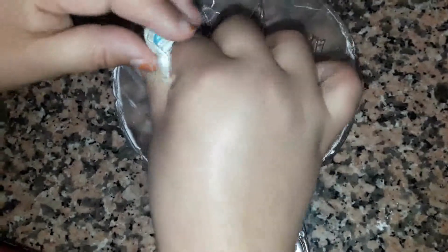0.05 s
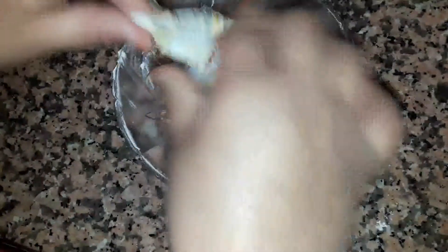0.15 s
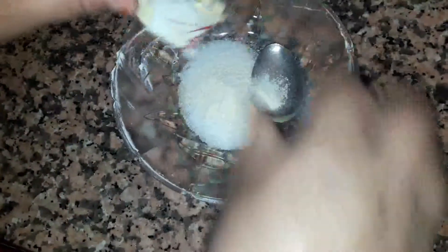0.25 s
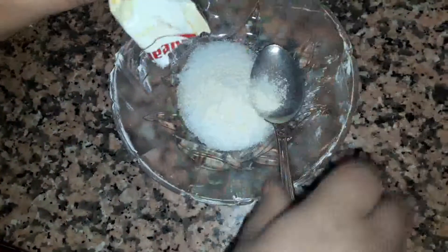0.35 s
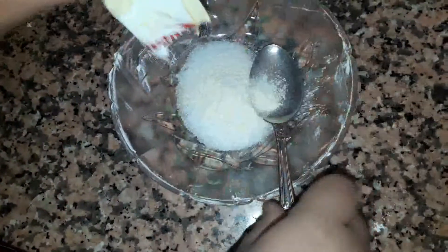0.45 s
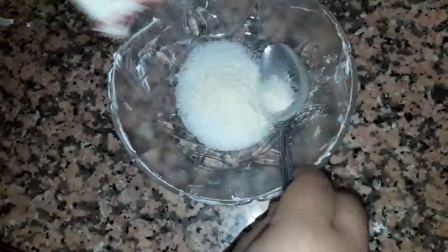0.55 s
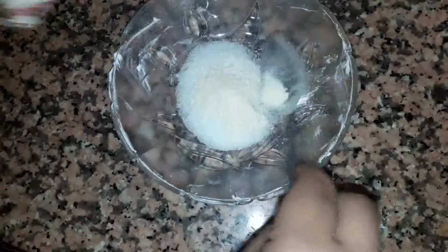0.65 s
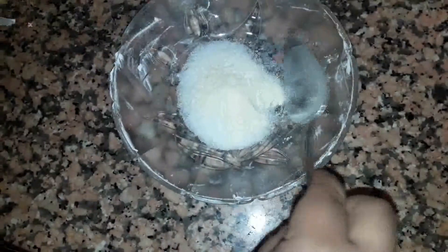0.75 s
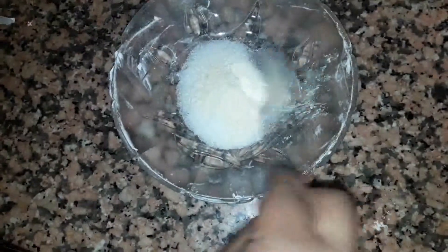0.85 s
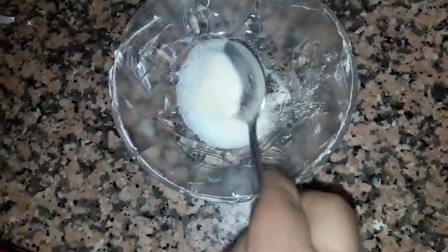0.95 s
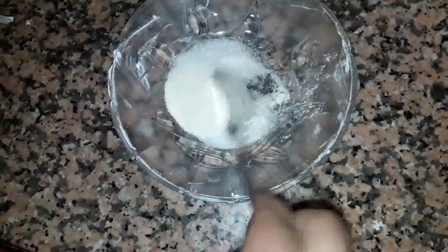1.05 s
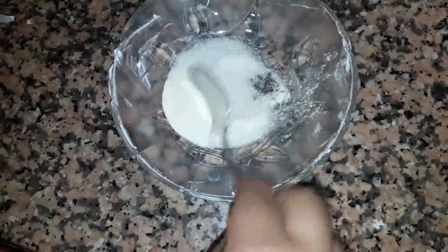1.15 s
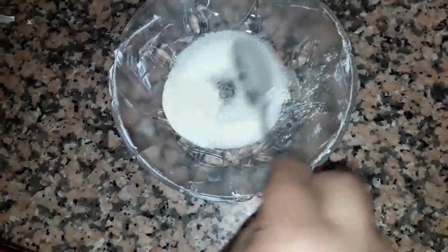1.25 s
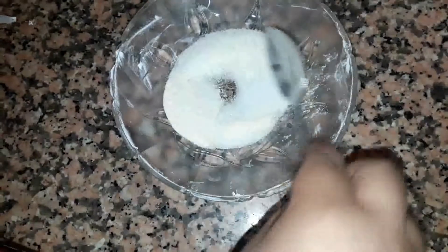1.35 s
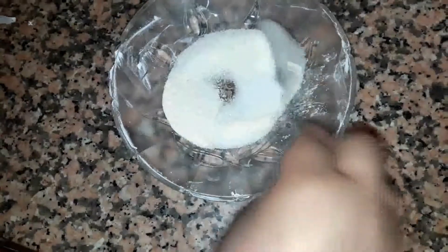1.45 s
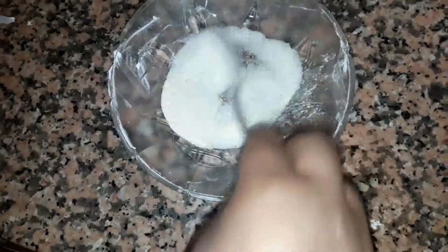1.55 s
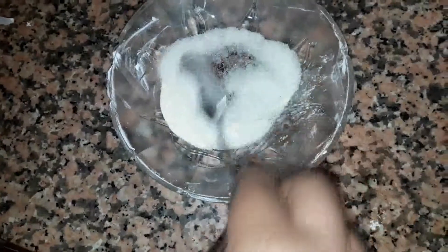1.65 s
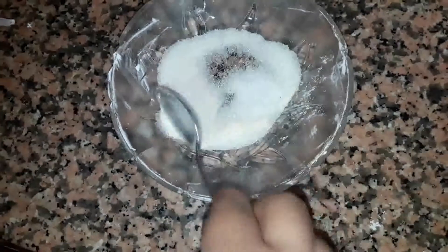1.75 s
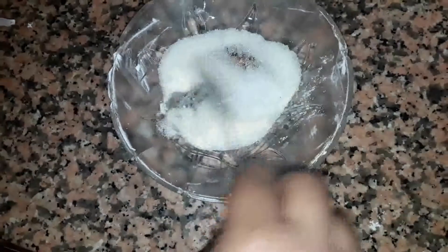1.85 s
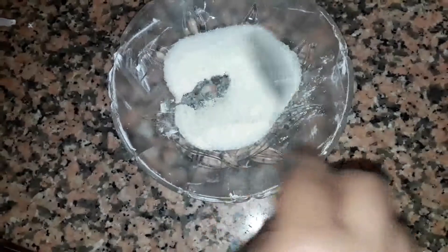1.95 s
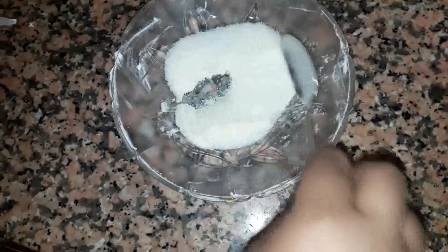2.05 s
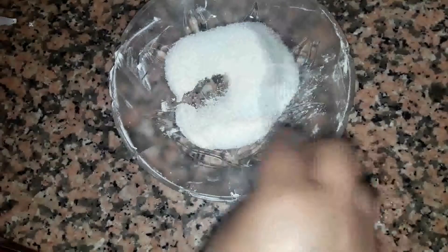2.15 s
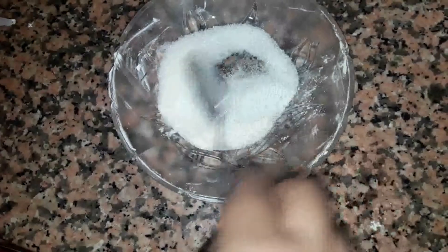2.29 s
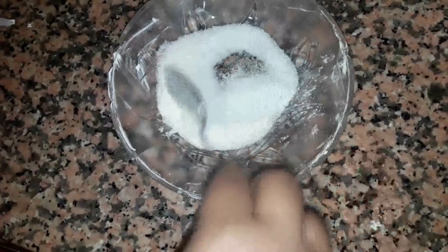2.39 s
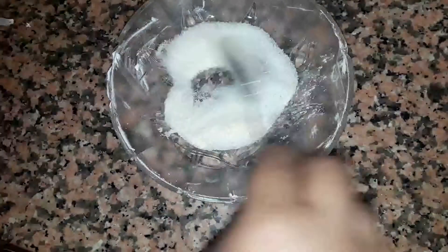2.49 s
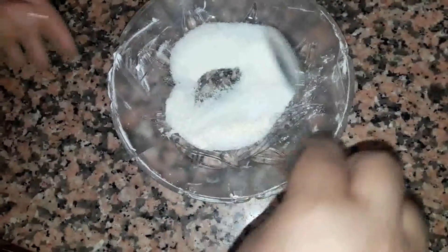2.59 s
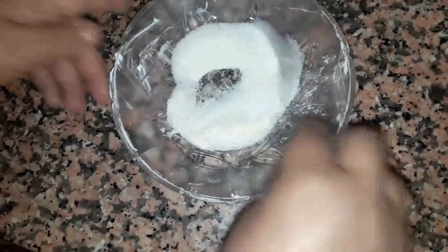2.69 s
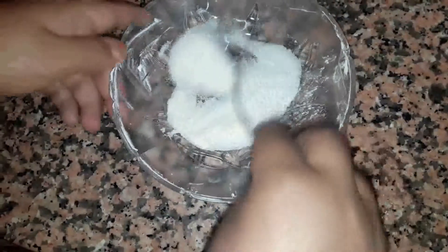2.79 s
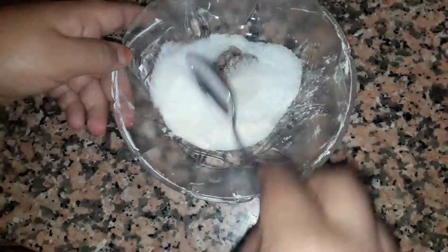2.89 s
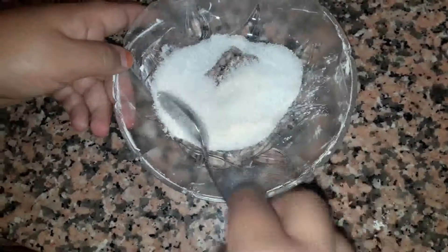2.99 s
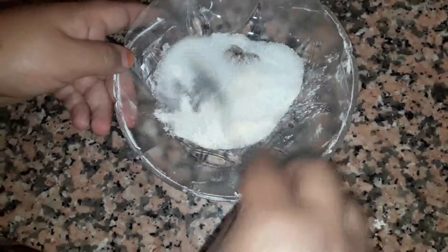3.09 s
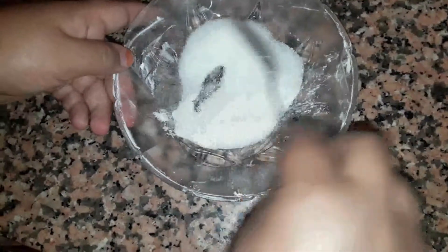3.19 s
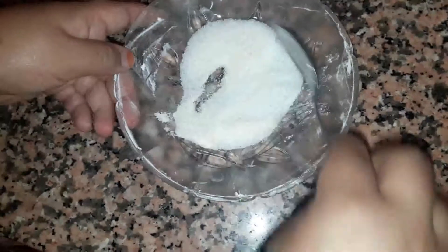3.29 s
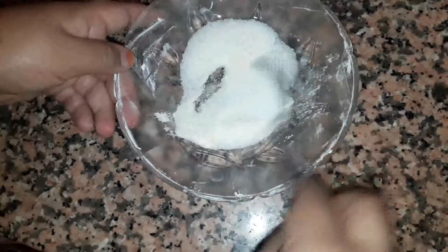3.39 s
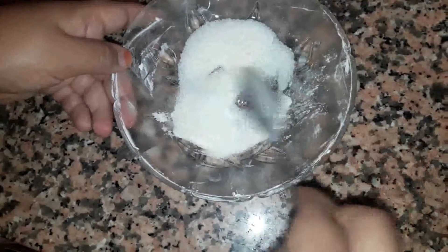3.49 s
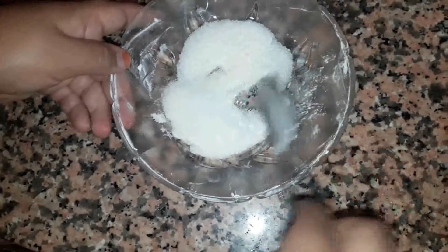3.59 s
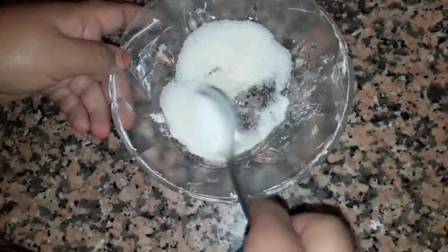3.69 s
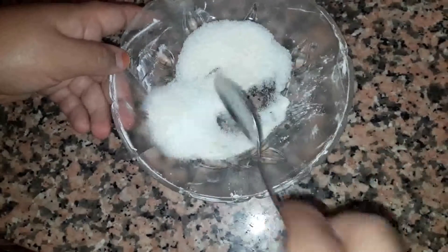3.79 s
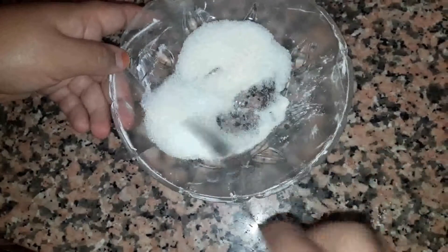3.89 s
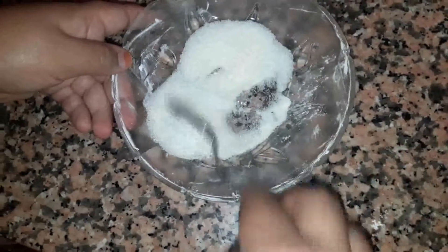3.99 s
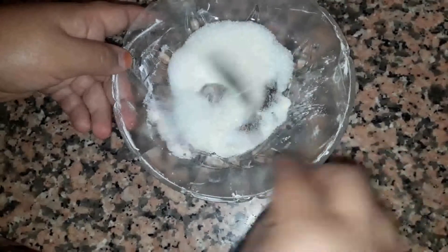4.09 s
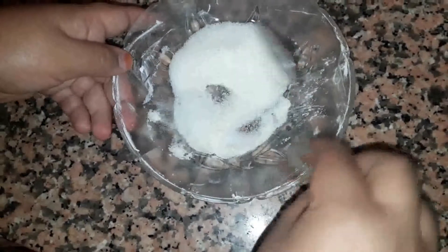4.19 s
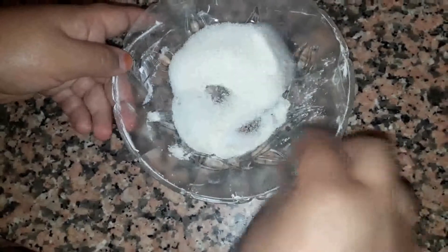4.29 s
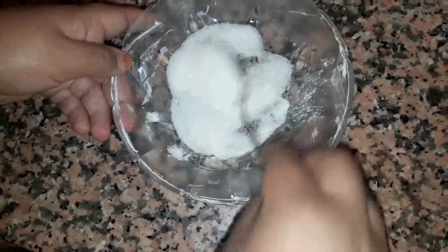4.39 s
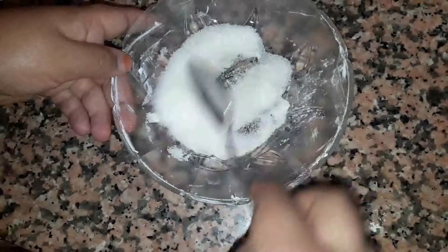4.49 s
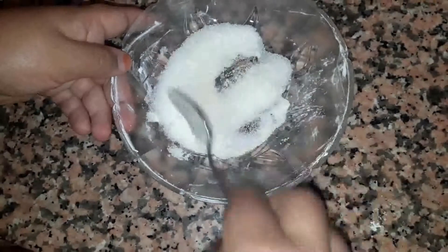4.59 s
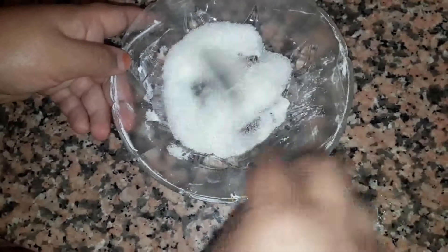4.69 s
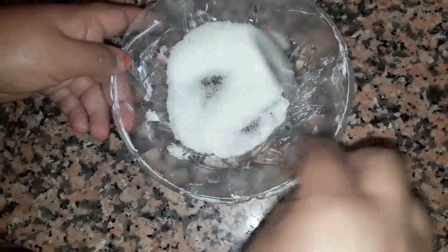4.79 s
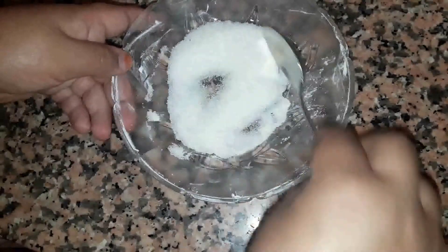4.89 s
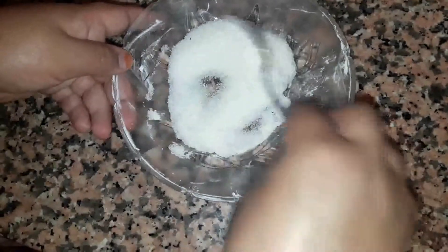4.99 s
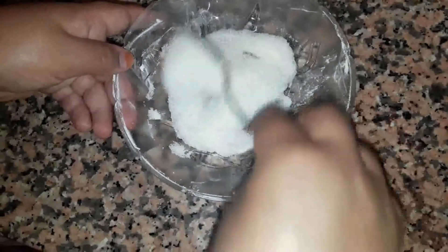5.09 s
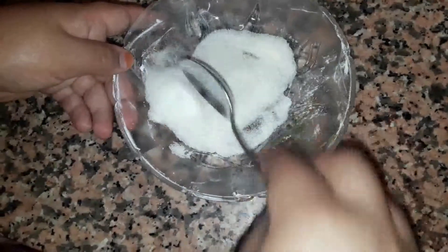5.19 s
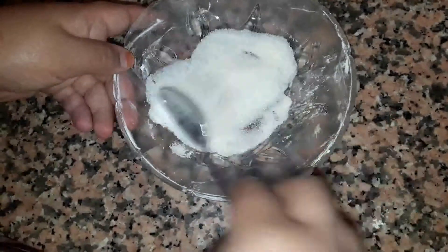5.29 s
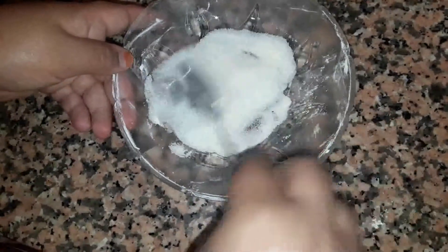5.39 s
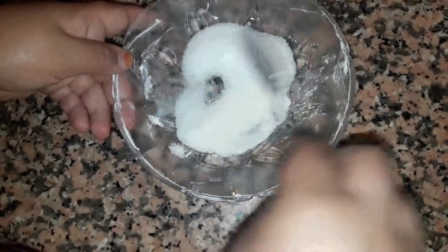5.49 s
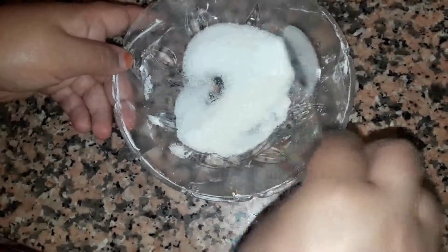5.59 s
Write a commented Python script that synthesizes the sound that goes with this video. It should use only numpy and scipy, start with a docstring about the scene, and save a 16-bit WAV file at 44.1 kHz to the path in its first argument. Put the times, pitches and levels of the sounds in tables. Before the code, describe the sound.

Close up in a small hard-walled kitchen, a thin packet snaps and crackles as powder hisses out. A metal spoon taps a glass bowl, then hits it hard with one bright short ring and a thud. Rapid stirring follows, about three turns a second, with gritty scrapes and powder-damped clinks. Low handling rumble and bumps come from a hand-held microphone with limited treble, over a faint steady hush.

```python
"""A steel spoon strikes a glass bowl once so that it rings, then stirs powder in it about three turns a second.
Each contact makes a knock, a crack and short dying tones; filtered random grains make the scrape between.
Before that a packet is crinkled and shaken out: snapping creases, a crackle of film and a hiss of powder.
Packed powder creaks in short chirps; low filtered noise is the rumble of bowl and hand-held microphone.
The bowl stands on a stone counter in a small kitchen, heard as faint dense echoes and a steady hush."""
import sys
import numpy as np
from scipy import signal
from scipy.fft import rfft, irfft, next_fast_len
from scipy.io import wavfile
from scipy.ndimage import uniform_filter1d

SR = 44100
rng = np.random.default_rng(int(sys.argv[2]) if len(sys.argv) > 2 else 0)


def transcribe(u):
    """Save the signal u as a 16-bit wav file named by the first command-line argument.

    u: samples, shape (n,) or (channels, n), limited to [-1, 1]; the rate is SR.
    q: integer samples, one column per channel.
    """
    v = np.clip(np.atleast_2d(u).T, -1, 1)
    q = np.round(v * 32767).astype(np.int16)
    wavfile.write(sys.argv[1], SR, q)


N = 249165  # length of the scene in samples
TIME = np.arange(N) / SR


def gain_of(db):
    """Turns decibels into an amplitude factor."""
    return 10 ** (np.asarray(db) / 20)


def evened(x):
    """Scales a sound to an average (rms) level of 1."""
    return x / np.sqrt(np.mean(x ** 2) + 1e-20)


def noise(count):
    """Plain random noise."""
    return rng.standard_normal(count)


def read(points, hz):
    """Reads a table between its points, along a logarithmic frequency axis."""
    f, value = np.transpose(points)
    return np.interp(np.log(hz + 1), np.log(f + 1), value)


def coloured(x, spectrum):
    """Filters a sound by a table of (frequency [Hz], level [dB])."""
    size = next_fast_len(len(x) + 2048)
    gain = gain_of(read(spectrum, np.fft.rfftfreq(size, 1 / SR)))
    return irfft(rfft(x, size) * gain, size)[:len(x)]


def fade(t, t60):
    """Exponential decay that has dropped by 60 dB after t60 seconds."""
    return np.exp(-np.log(1000) * t / t60)


def swell(s, attack_s, hold_s, t60):
    """The level of one gesture starting at time s: a straight rise, a hold, an exponential release."""
    t = TIME - s
    return np.clip(t / attack_s, 0, 1) * fade(np.maximum(t - attack_s - hold_s, 0), t60)


def add(mix, s, sound):
    """Mixes a sound in at time s."""
    part = mix[max(round(s * SR), 0):][:len(sound)]
    part += sound[:len(part)]


def ring(modes, t, spread_db=0, detune=0):
    """Dying tones of a struck body; the place of the blow may change the strength and pitch of each."""
    hz, db, t60 = np.transpose(modes)[:, :, None]
    strength, shift, side = rng.standard_normal((3, len(modes), 1))
    swing = np.sign(side) * np.sin(2 * np.pi * hz * (1 + detune * shift) * t)
    return (gain_of(db + spread_db * strength) * fade(t, t60) * swing).sum(0)


def grains(per_s, spread_db):
    """Sparse random clicks, most of them small and a few large."""
    size = gain_of(spread_db * np.minimum(rng.exponential(1, N), 4))
    present = rng.random(N) < per_s / SR
    return evened(size * noise(N) * present)


# colour of the room's steady hush: (frequency [Hz], relative level [dB per Hz])
HUSH_COLOUR = [(20, -21.5), (45, -5.5), (90, -0.5), (140, -1.5), (220, -4.5), (370, -9), (470, -2),
               (600, -11), (1000, -12), (1900, -11.5), (3200, -21), (4400, -26.5), (7200, -25),
               (7800, -33.5)]


def hush():
    """The steady quiet of the room: filtered noise at one level throughout."""
    return gain_of(-63) * evened(coloured(noise(N), HUSH_COLOUR))


# colour of the rumble: (frequency [Hz], relative level [dB per Hz])
RUMBLE_COLOUR = [(18, -49.5), (30, -20.5), (59, -20.5), (81, -6.5), (125, 0), (205, -8.5), (256, -11.5),
                 (293, -5.5), (397, -20.5), (481, -14.5), (616, -24.5), (800, -28), (1040, -50.5),
                 (1760, -120)]
# the hand shifting its grip on the microphone's case: (time [s], hold [s], level before rumble_db [dB])
GRIPS = [(-.03, 0.094, -49.5), (0.426, 0.31, -57.5), (0.751, 0.23, -55.5), (1.356, 0.42, -44),
         (5.53, .1, -51)]
GRIP_ATTACK_S, GRIP_T60 = .03, 0.4
# turns of the spoon through the powder, also played by scrape(), levels before each sound's own trim:
# (time [s], hold of the scrape [s], rub on the glass [dB], hiss of the grains [dB], rumble of the bowl [dB])
TURNS = [(0.694, 0.04, -69.5, -68, -64), (1.084, 0.045, -64.5, -61.5, -66), (1.22, 0.057, -67, -55, -55),
         (1.493, 0.023, -70.5, -47, -56.5), (1.732, .1, -54.5, -57, -62), (1.877, 0.056, -56, -58, -52.5),
         (2.15, 0.084, -57, -54, -50.5), (2.478, 0.036, -76, -60.5, -58), (2.77, 0.13, -70.5, -61, -54),
         (3.131, 0.065, -76, -71, -53), (3.451, 0.045, -66, -51, -64.5), (3.69, .08, -61, -56, -53.5),
         (4.047, 0.037, -76, -79.5, -68), (4.405, 0.037, -71.5, -54, -52.5), (4.721, .07, -65, -72, -56),
         (4.992, 0.16, -55.5, -56, -56.5), (5.462, .12, -69, -64, -52.5)]
PUSH_ATTACK_S, PUSH_HOLD_S, PUSH_T60 = 0.0067, .08, .5  # rises sooner than the scrape


def rumble(rumble_db=-2, holding_db=-65):
    """Low noise that swells with each push on the bowl and each change of grip."""
    pushes = [gain_of(db) * swell(s, PUSH_ATTACK_S, PUSH_HOLD_S, PUSH_T60) for s, *_, db in TURNS]
    grips = [gain_of(db) * swell(s, GRIP_ATTACK_S, hold_s, GRIP_T60) for s, hold_s, db in GRIPS]
    # separate rumbles add up in power
    level = np.sqrt(gain_of(holding_db) ** 2 + sum(part ** 2 for part in pushes + grips))
    return gain_of(rumble_db) * level * evened(coloured(noise(N), RUMBLE_COLOUR))


# soft bumps of the microphone's case: (time [s], peak level [dB], frequency [Hz])
BUMPS = [(1.382, -42.5, 135.7), (1.646, -40.5, 118), (1.755, -36, 141.7), (2.675, -52, 81.6),
         (4.41, -44.5, 122.2), (4.444, -37.5, 111), (5.555, -43, 152.1), (5.626, -43.5, 156.7)]


def bumps(rise_s=0.011):
    """Each bump is a short low tone that rises quickly and dies away."""
    out, t = np.zeros(N), TIME[:SR // 5]
    for s, db, hz in BUMPS:
        shape = t / rise_s * np.exp(1 - t / rise_s)
        add(out, s, gain_of(db) * shape * np.sin(2 * np.pi * hz * t))
    return out


# how long the kitchen's echoes last: (frequency [Hz], time to drop 60 dB [s])
KITCHEN_DECAY = [(150, 0.1), (700, .42), (1800, 0.36), (4000, 0.46), (7500, 0.39)]


def kitchen(x, first_s=.006):
    """Dense reflections of random sign off hard walls, each band dying at its own speed."""
    present = rng.random(SR) < 3000 / SR  # 3000 reflections a second
    taps = rng.choice([-1., 1.], SR) * present * (TIME[:SR] > first_s)
    hz, t, bands = signal.stft(taps, SR, nperseg=256)
    decay = fade(t, read(KITCHEN_DECAY, hz)[:, None])
    tail = signal.istft(bands * decay, SR, nperseg=256)[1]
    return signal.fftconvolve(x, tail / np.linalg.norm(tail))[:N]


# sharp creases of the packet: (time [s], level before snap_db [dB], frequency [Hz])
SNAPS = [(0.0364, -25, 2046), (0.0757, -26, 2180), (0.1146, -25, 2270), (0.1506, -34, 2050),
         (0.1913, -31.5, 2510), (0.238, -27.5, 2380), (0.2544, -27.5, 2300), (0.2934, -29.5, 2440),
         (0.3213, -26.5, 2570), (0.3532, -35, 2800), (0.401, -29, 2900), (0.431, -16, 2862),
         (0.5381, -41.5, 2870), (0.5812, -40.5, 2860)]
# colour of the packet's film: (frequency [Hz], relative level [dB per Hz])
FILM_COLOUR = [(150, -27), (400, -9.5), (900, -6), (1500, -6), (2200, 7), (2900, -0.5), (3800, -10),
               (4800, -2.5), (6000, -11), (7800, -7)]


def snaps(snap_db=-1, snap_t60=0.027, pop_db=-19, sag=.2, sag_s=0.0037):
    """Creases snap as bursts of noise; the harder the snap, the more the film pops with a pitch."""
    out, t = np.zeros(N), TIME[:SR // 10]
    for s, db, hz in SNAPS:
        crack = evened(coloured(noise(len(t)), FILM_COLOUR))
        # the pitch drops as the film slackens
        pitch = hz * (1 + sag * (np.exp(-t / sag_s) - .7))
        pop = np.sqrt(gain_of(db - pop_db)) * np.sin(2 * np.pi * np.cumsum(pitch) / SR)
        add(out, s, gain_of(db + snap_db) * fade(t, snap_t60) * (crack + pop))
    return out


def crinkle():
    """Folds of nine sizes, from large and dull to small and bright, each crackle in bunches of their own."""
    crackle = 0
    for hz in np.geomspace(500, 6500, num=9):
        clumps = gain_of(4.1 * evened(uniform_filter1d(noise(N), size=900)))
        fold_band = [(hz / 1.8, -40), (hz / 1.15, 0), (hz * 1.15, 0), (hz * 1.8, -40)]
        crackle = crackle + coloured(clumps * grains(per_s=1800, spread_db=2.8), fold_band)
    return evened(coloured(crackle, FILM_COLOUR))


# colour of the pouring powder: (frequency [Hz], relative level [dB per Hz])
POUR_COLOUR = [(2500, -14), (4500, -12.5), (5600, -3), (6800, 3), (7800, 2.5)]
# shakes of the packet: (time [s], hold [s], crinkle level [dB], pouring hiss level before pour_db [dB])
SHAKES = [(-.01, 0.065, -45.5, -37), (0.154, 0.081, -41.5, -44), (.3, .14, -52.5, -65.5),
          (0.496, 0.12, -56.5, -64.5), (0.63, 0.03, -51, -54)]
SHAKE_ATTACK_S, SHAKE_T60 = 0.016, 0.15


def packet(pour_db=-1):
    """Creases snap over a fine crackle of film and a hiss of powder, which swell with each shake."""
    out = snaps()
    film = crinkle()
    pour = gain_of(pour_db) * evened(coloured(grains(per_s=4000, spread_db=0.5), POUR_COLOUR))
    for s, hold_s, film_db, powder_db in SHAKES:
        shake = swell(s, SHAKE_ATTACK_S, hold_s, SHAKE_T60)
        out += shake * (gain_of(film_db) * film + gain_of(powder_db) * pour)
    return out


# packed powder creaking under the spoon: (time [s], hold [s], level [dB], middle frequency [Hz])
CREAKS = [(1.335, 0.012, -45.5, 1094), (1.751, .025, -56.5, 1165), (1.93, 0.09, -58, 1180),
          (2.069, 0.0098, -45, 1240), (3.527, .14, -61.5, 462)]
CREAK_ATTACK_S, CREAK_T60 = 0.0091, 0.082


def creak(slips_per_s=160, slip_t60=0.0081):
    """Packed powder sticks and slips unevenly; each slip is a short dull chirp."""
    out, t = np.zeros(N), TIME[:SR // 50]
    for start, hold_s, level_db, hz in CREAKS:
        slips = np.zeros(N)
        gap, size, pitch = rng.standard_normal((60, 3)).T
        times = start + np.cumsum(np.exp(0.45 * gap)) / slips_per_s
        for s, db, shift in zip(times, 3 * size, 1 + .12 * pitch):
            chirp = t * fade(t, slip_t60) * np.sin(2 * np.pi * hz * shift * t)
            add(slips, s - 1 / slips_per_s, gain_of(db) * chirp)
        slips /= np.std(slips[slips != 0])
        out += gain_of(level_db) * swell(start, CREAK_ATTACK_S, hold_s, CREAK_T60) * slips
    return out


# colour of the rub on the glass: (frequency [Hz], relative level [dB per Hz])
RUB_COLOUR = [(300, -25), (700, 8), (1000, -10.5), (1300, -1), (2200, -6.5), (2800, -10.5), (4000, -31)]
# colour of the hiss of crushed grains: (frequency [Hz], relative level [dB per Hz])
HISS_COLOUR = [(1800, -28), (2800, -2), (3500, 3), (4400, -4.5), (5100, 6.5), (5700, -4), (6500, 3.5),
               (7400, -1), (8000, -4.5)]
# tones of spoon and bowl pressed together, damped by the powder, also played by clink():
# (frequency [Hz], level [dB], time to drop 60 dB [s])
PRESSED = [(760, -8, .025), (960, -4, .065), (1330, -8, .03), (1470, -2, .05), (1640, -4, .035),
           (1880, 2, .045), (2050, -1, .025), (2245, 2, .045), (2420, -2, .035), (2730, 0, .03),
           (2950, -1, .025), (3370, -2, .028), (3630, -4, .03), (4010, -9, .03), (5030, -6, .05),
           (5390, -12, .03), (6380, -1, .04), (6580, -3, .035), (6920, 2, .045), (7100, -4, .03),
           (7330, 1, .05), (7650, -6, .035)]
SCRAPE_ATTACK_S, SCRAPE_T60 = 0.066, .55  # the spoon digs in, ploughs on, and lifts


def scrape(rub_db=-5, hiss_db=-7.5, ringing=0.78):
    """On every turn, grains crushed under the spoon rasp directly and tickle the bowl's tones."""
    crush = grains(per_s=2900, spread_db=2.5)
    tickle = evened(signal.oaconvolve(crush, ring(PRESSED, TIME[:SR // 8]))[:N])
    drive = crush + ringing * tickle
    rub = gain_of(rub_db) * evened(coloured(drive, RUB_COLOUR))
    hiss = gain_of(hiss_db) * evened(coloured(drive, HISS_COLOUR))
    out = np.zeros(N)
    for s, hold_s, glass_db, grain_db, _ in TURNS:
        turn = swell(s, SCRAPE_ATTACK_S, hold_s, SCRAPE_T60)
        out += turn * (gain_of(glass_db) * rub + gain_of(grain_db) * hiss)
    return out


# tones of the bowl's free wall, also played by spoon(): (frequency [Hz], level [dB], time to drop 60 dB [s])
WALL = [(1570, -10, .22), (1925, 0, .15), (2885, 0, .33), (4036, -14, .27), (5012, -7, .14),
        (5285, -16, .25), (6362, -6, .11), (6508, 0, .12), (6842, 9, .1), (6936, 6, .115), (7314, -8, .15)]
# colour of the bare click of a contact: (frequency [Hz], relative level [dB per Hz])
CRACK_COLOUR = [(300, -16), (560, -14), (830, 1), (1150, 2.5), (2000, 14), (3200, -13.5), (4400, -5.5),
                (5800, -3.5), (7000, 4.5), (7800, 2.5)]
# borders between the four bands of a clink: (frequency [Hz])
BAND_EDGES_HZ = [1200, 3000, 5800]
LEAD = SR // 200  # samples of silence before each clink, room for its filters to settle
LOW_DB, LOW_DB_PER_OCTAVE, MID_KNOCK_HZ = -11, -9.5, 1880  # the lower the knock, the fuller the lowest band


def clink(db, upper_db, top_db, knock_hz, chatter_s, knock_db=10, knock_t60=0.032, crack_db=7,
          crack_t60=0.052, wall_db=-24, bounce=0.77, drag_db=-16, drag_t60=0.2):
    """The spoon hits, skips and drags: each contact gives a dead knock, a crack and a short ring."""
    t = TIME[:SR // 5]
    body = ring(PRESSED, t, spread_db=3, detune=.014) + gain_of(wall_db) * ring(WALL, t)
    body += gain_of(knock_db) * fade(t, knock_t60) * np.sin(2 * np.pi * knock_hz * t)

    # one sure hit, then random contacts that weaken
    force = bounce * np.exp(-(t / chatter_s) ** 2) + gain_of(drag_db) * fade(t, drag_t60)
    contacts = force * noise(len(t)) * (rng.random(len(t)) < 1100 / SR)
    contacts[0] = 1

    # every contact crushes fresh grains, so the cracks add up in power
    crush = np.sqrt(abs(signal.fftconvolve(contacts ** 2, fade(t, crack_t60) ** 2)[:len(t)]))
    crack = crush * evened(coloured(noise(len(t)), CRACK_COLOUR))
    sound = signal.fftconvolve(contacts, body)[:len(t)] + gain_of(crack_db) * crack

    # edge or back of the spoon, bare or powdered glass: each blow has its own balance of bands
    low_db = LOW_DB + LOW_DB_PER_OCTAVE * np.log2(knock_hz / MID_KNOCK_HZ)
    edges, out = [480, *BAND_EDGES_HZ, 8000], 0
    for lo, hi, band_db in zip(edges, edges[1:], (low_db, 0, upper_db, top_db)):
        sos = signal.butter(3, [lo, hi], "band", fs=SR, output="sos")
        band = signal.sosfiltfilt(sos, np.pad(sound, (LEAD, 0)))
        start_level = np.std(band[LEAD:][:SR // 50])  # over the first 20 ms
        out = out + gain_of(db + band_db) * band / start_level
    return out


# spoon on glass: (time [s], level at 1.2-3 kHz before clink_db [dB], upper band relative to that [dB],
# top band relative to that [dB], knock frequency [Hz], length of the chatter [s])
CLINKS = [(0.6197, -37, -20, -15, 1605, .0053), (0.6904, -59.5, 4, 4.5, 2370, .0045),
          (0.8236, -51.5, -2, -6, 2650, 0.0018), (.8617, -21.5, -0.5, 2.5, 2970, .0042),
          (0.8734, -21, -7.5, -1, 2040, 0.0058), (.885, -39.5, -5, -3, 1870, 0.0066),
          (1.2172, -51.5, -4, -20, 2200, 0.0016), (1.2259, -38, -1.5, -4, 2295, 0.012),
          (1.3188, -49.5, -15.5, -1, 1910, .0028), (1.5164, -47.5, -8, 3.5, 1513, 0.0089),
          (1.5322, -39.5, -6.5, -9, 1660, 0.0076), (1.616, -51.5, -3.5, -4, 2160, .016),
          (1.6573, -54, -12, -12, 2113, .0042), (1.8863, -42, -6.5, -4, 2115, 0.0015),
          (2.1235, -40.5, -14, -24.5, 1752, .002), (2.1598, -31.5, -11.5, -12.5, 1825, 0.006),
          (2.222, -38.5, -9, -1.5, 2030, 0.021), (2.2636, -44, -17, -12, 1863, 0.0089),
          (2.507, -32.5, -13.5, 1.5, 1836, 0.005), (2.563, -51.5, -10, -11, 1890, .012),
          (2.6133, -51.5, -9.5, -8.5, 2170, 0.0064), (2.7719, -40, -3.5, -5, 3410, 0.0059),
          (2.779, -36, -7.5, 2, 2410, 0.017), (2.807, -41.5, -24, -14, 1480, 0.0078),
          (2.8405, -37.5, -10.5, -8, 2267, 0.011), (2.853, -42.5, -18.5, -19, 1890, 0.018),
          (3.1445, -30.5, -12.5, -13, 2293, .0055), (3.2152, -46.5, -8, -1.5, 2140, .0048),
          (3.4487, -43, -1.5, -6, 2273, 0.0053), (3.46, -42.5, -16, -17.5, 1470, 0.0069),
          (3.5013, -48.5, -14, -2, 1526, .0043), (3.6952, -23.5, -12.5, -9.5, 1480, 0.0023),
          (3.7, -30, -16.5, -17, 2230, 0.001), (3.709, -48.5, -5, 14, 1930, .008),
          (3.762, -39.5, -5, 1.5, 2180, 0.0099), (4.0551, -32, -15, -12, 2210, 0.0053),
          (4.0632, -31, -19.5, -7.5, 1960, 0.0026), (4.125, -40.5, -19, -25, 2216, 0.0045),
          (4.411, -48, -6, 0, 1533, .012), (4.4265, -40.5, -27, -15.5, 1420, 0.0058),
          (4.7294, -39.5, -9, 3, 2144, .0098), (4.987, -37, -12.5, -8, 2290, 0.01),
          (5.0467, -57, -13, -18, 1795, .014), (5.105, -46.5, -21, -21, 1547, 0.015),
          (5.2308, -51.5, -21, -17, 1805, 0.0098), (5.4603, -30, -10, -6, 2360, 0.0071),
          (5.535, -49, -6.5, -5.5, 2230, .016)]
# the one hard blow on the wall: (time [s], ring level [dB], level of the bowl's thud on the counter [dB])
BLOW = (.862, -18.5, -21.5)
# tones of the bowl against the counter: (frequency [Hz], level [dB], time to drop 60 dB [s])
THUD = [(45, -8.5, 0.057), (82, -0.5, 0.047), (121, 0, 0.053), (172, -2.5, 0.065), (233.3, 0, 0.044),
        (327, -3.5, 0.021), (441.3, 1.5, 0.021)]


def spoon(clink_db=-0.97):
    """All the clinks, and the hard blow that rings the wall and bumps the bowl on the counter."""
    out, t = np.zeros(N), TIME[:SR]
    for s, *blow in CLINKS:
        add(out, s - LEAD / SR, gain_of(clink_db) * clink(*blow))
    s, ring_db, thud_db = BLOW
    add(out, s, gain_of(ring_db) * ring(WALL, t) + gain_of(thud_db) * ring(THUD, t))
    return out


def scene():
    """Bowl and packet close to the microphone, with the kitchen behind them."""
    background = hush() + rumble() + bumps()
    near = packet() + creak() + scrape() + spoon()
    # colour of the echoes: (frequency [Hz], level [dB])
    echo_colour = [(150, -18.0), (900, -8), (2000, -12.0), (4000, -17.0), (7000, -16.5)]
    room = coloured(kitchen(near), echo_colour)
    return (near + room + background)[None]


# response of the microphone: (frequency [Hz], level [dB])
MICROPHONE = [(20, -12), (60, 0), (7620, 0), (7900, -22), (8400, -36), (9000, -45)]


def record(dry):
    """A narrow-band microphone that softly rounds off loud peaks and cuts the highest treble."""
    ceiling, edge_hz = .8, 8882
    sound = coloured(ceiling * np.tanh(dry[0] / ceiling), MICROPHONE)
    low_pass = signal.firwin(511, edge_hz, window=("kaiser", 9), fs=SR)
    return signal.oaconvolve(sound, low_pass, "same")[None]


dry = scene()
out = record(dry)
transcribe(out)
```